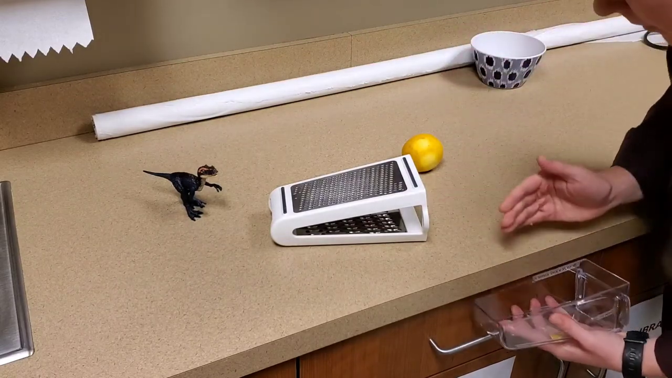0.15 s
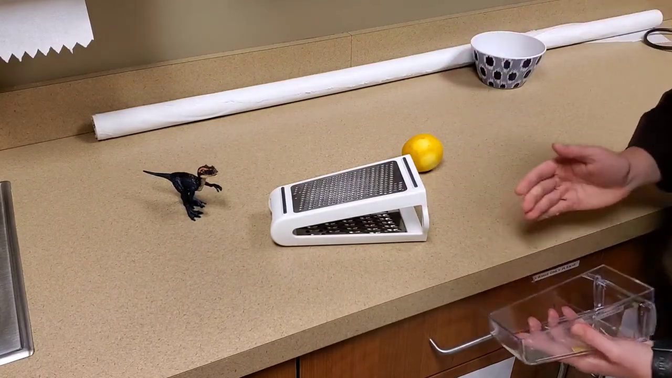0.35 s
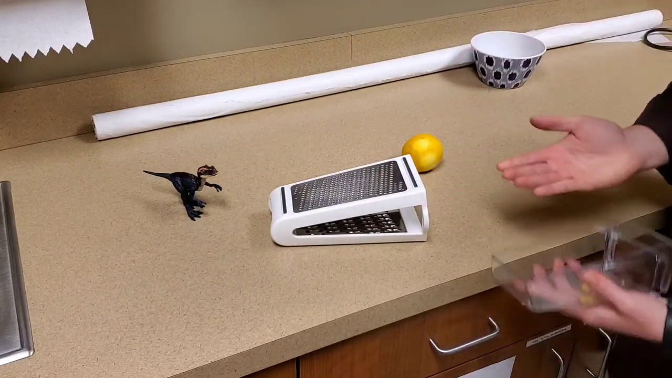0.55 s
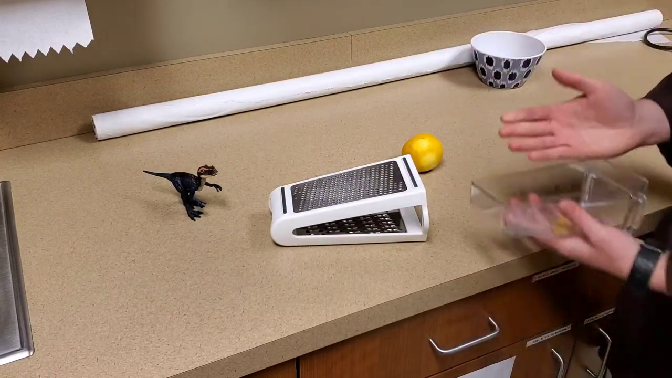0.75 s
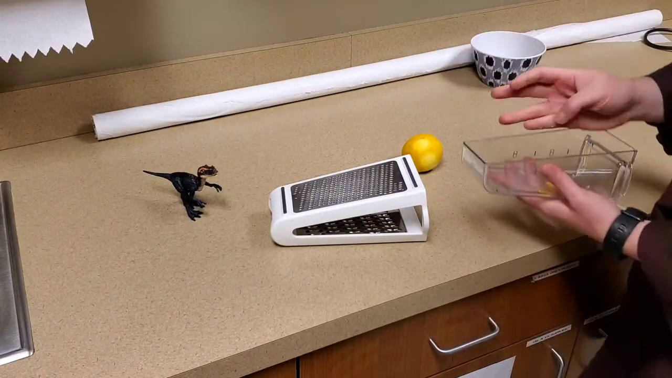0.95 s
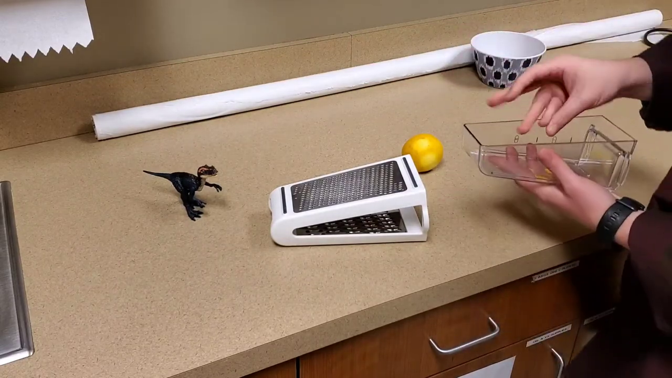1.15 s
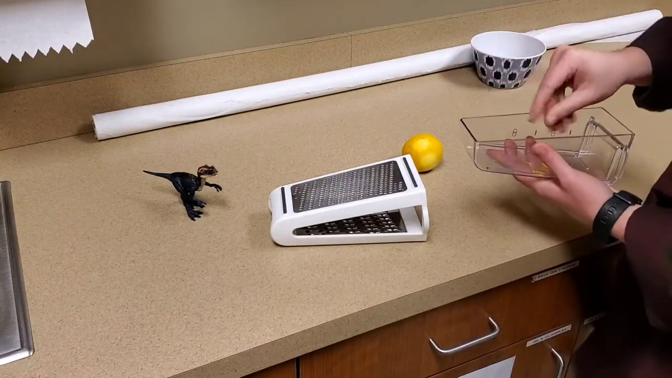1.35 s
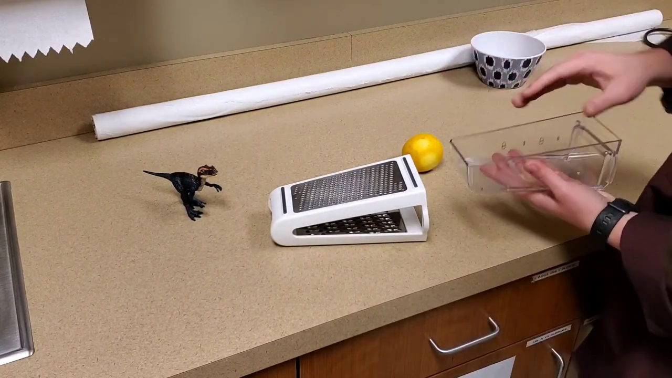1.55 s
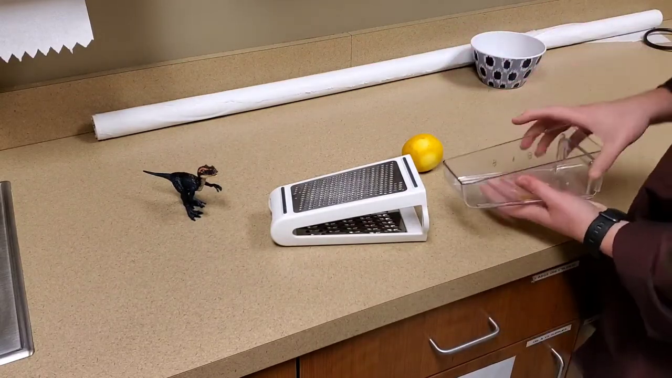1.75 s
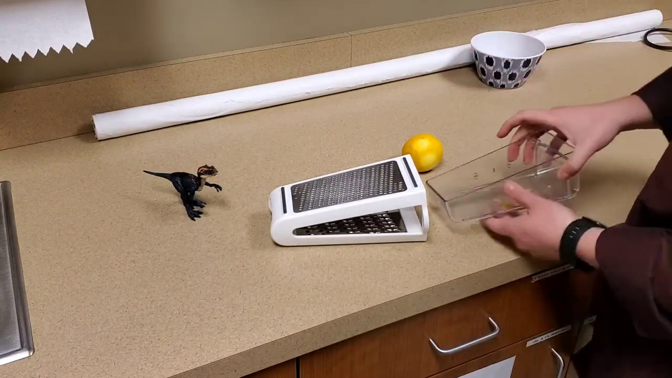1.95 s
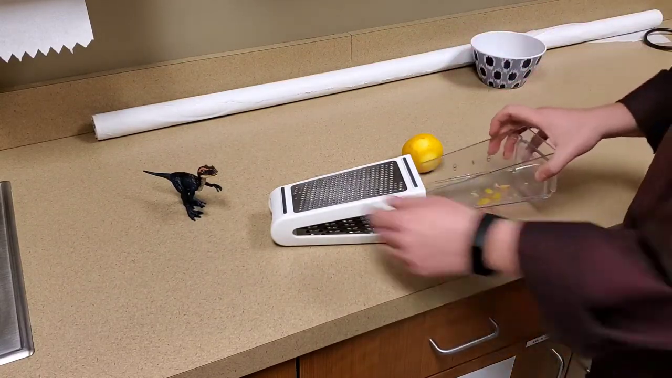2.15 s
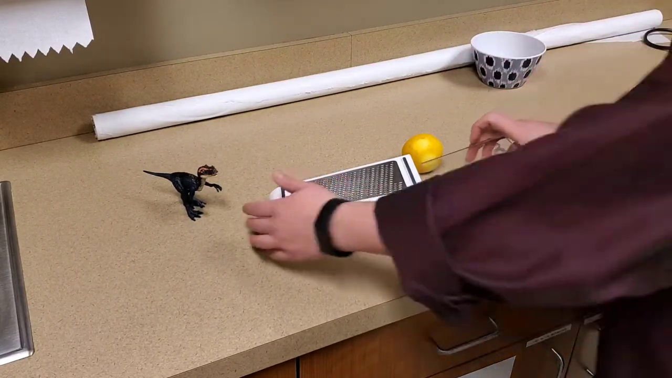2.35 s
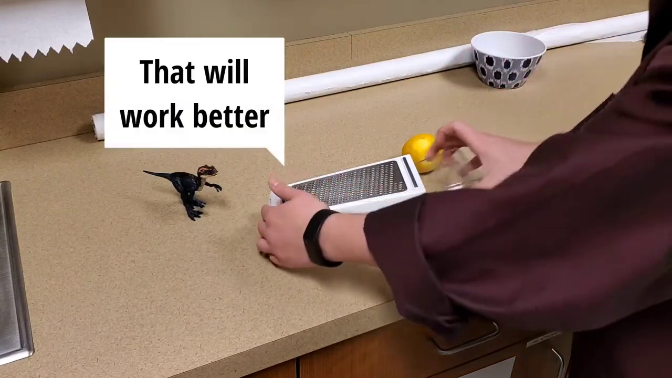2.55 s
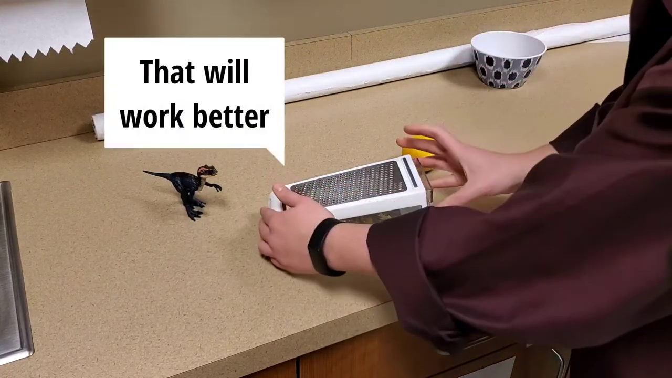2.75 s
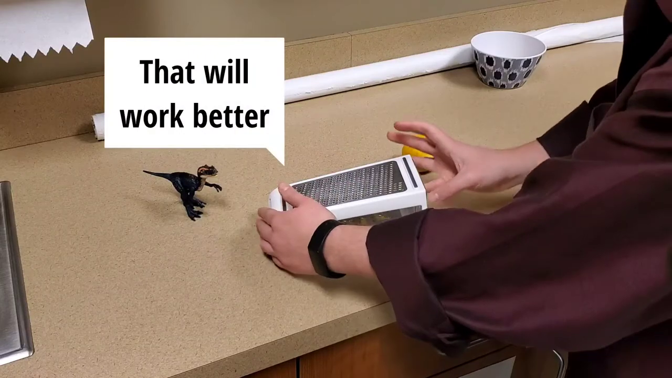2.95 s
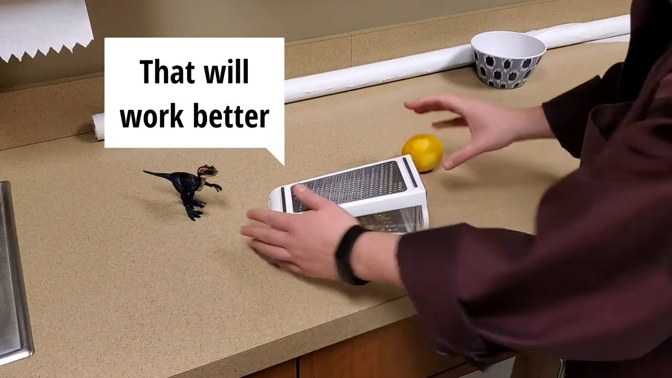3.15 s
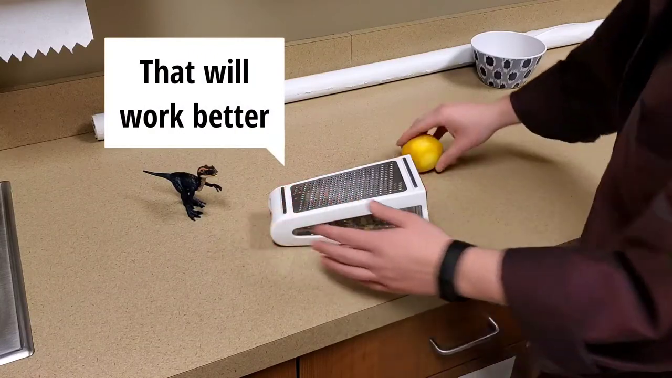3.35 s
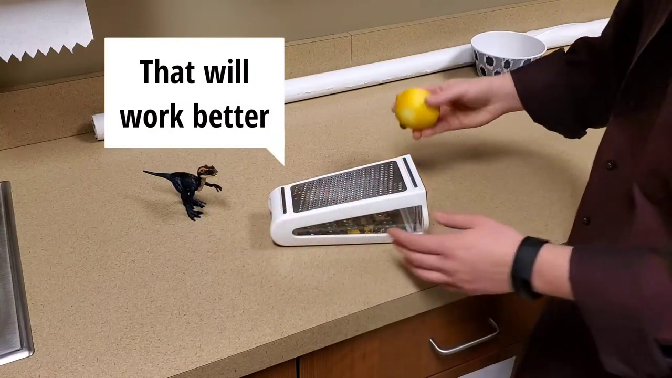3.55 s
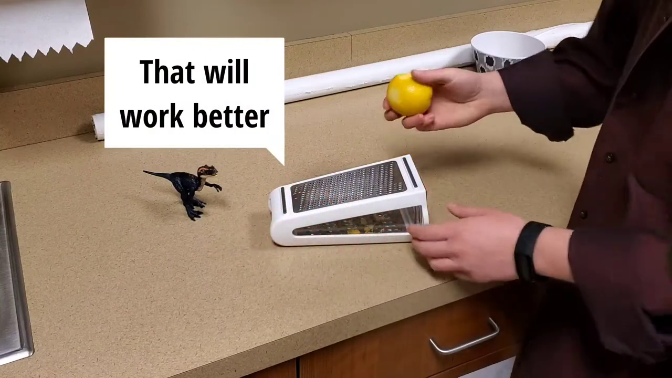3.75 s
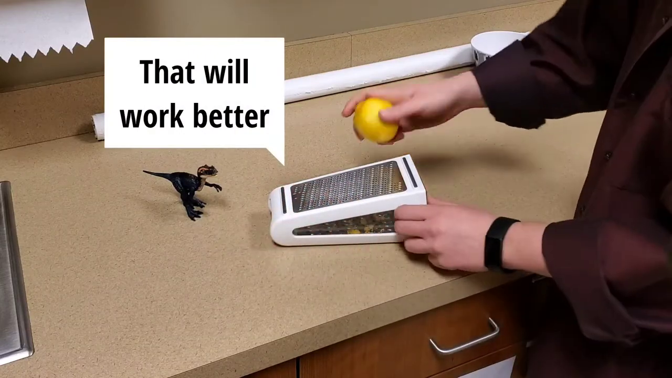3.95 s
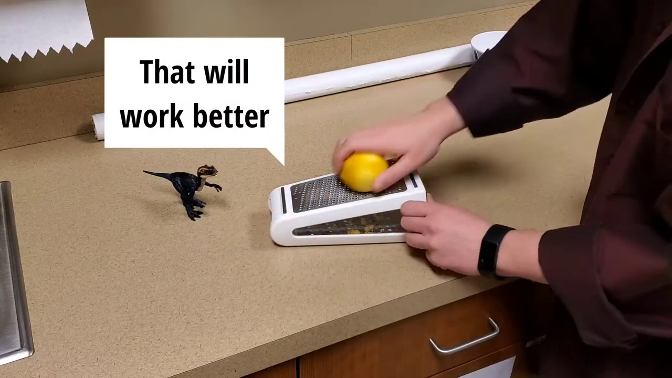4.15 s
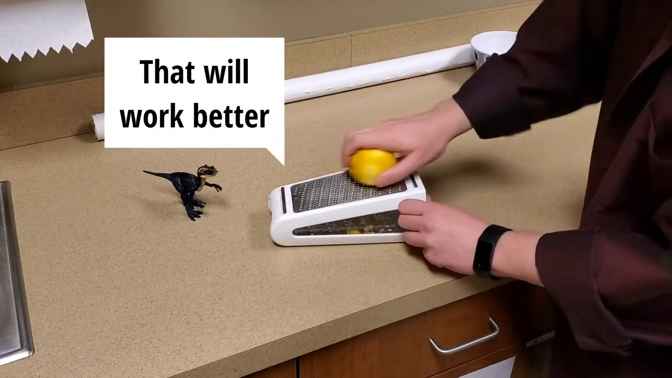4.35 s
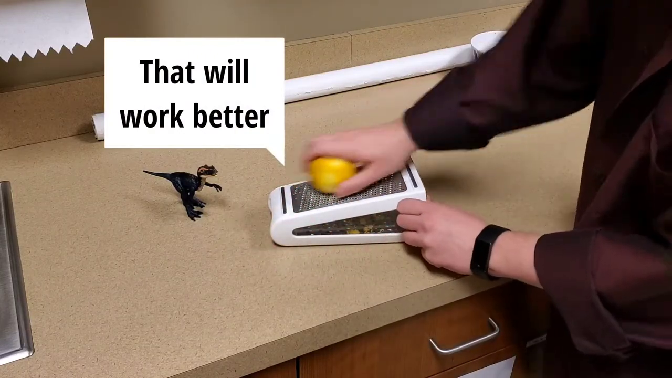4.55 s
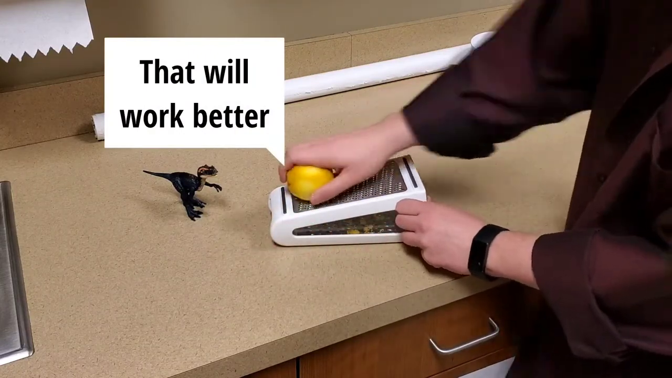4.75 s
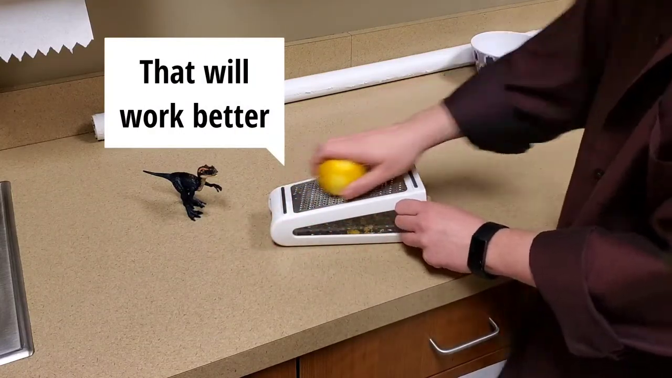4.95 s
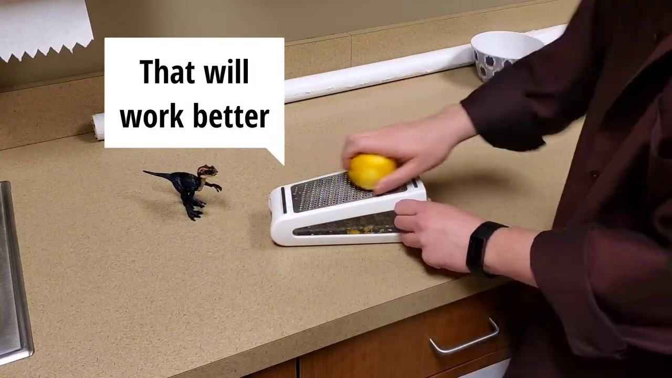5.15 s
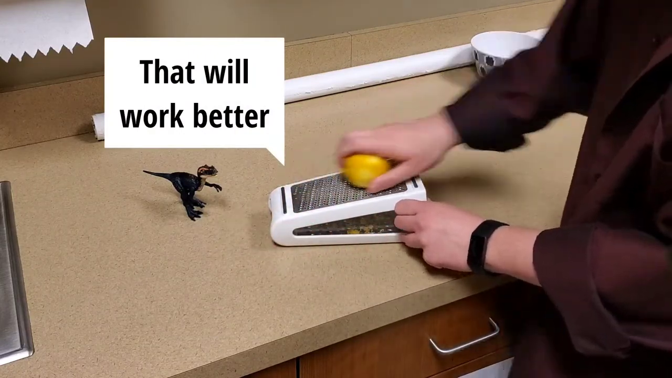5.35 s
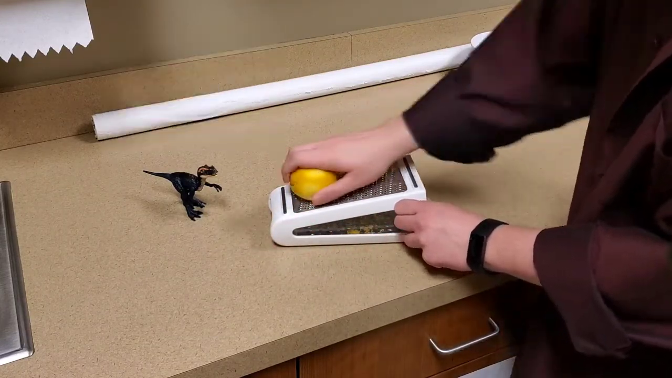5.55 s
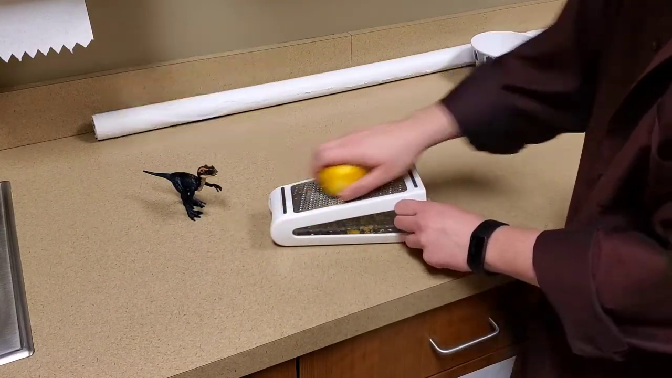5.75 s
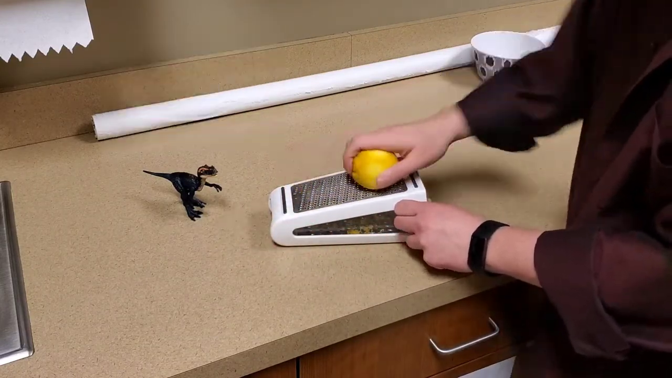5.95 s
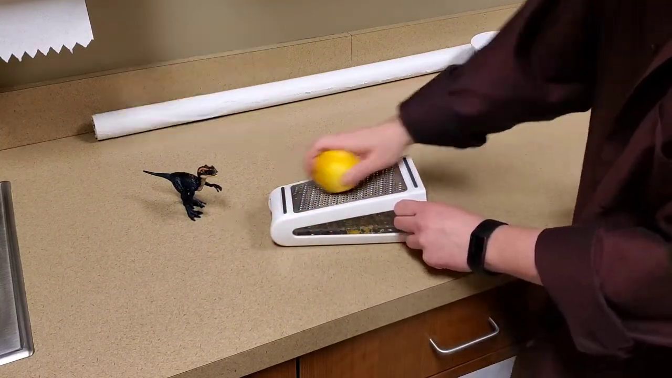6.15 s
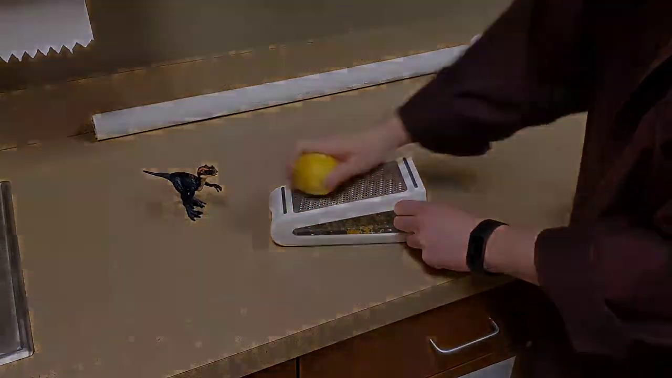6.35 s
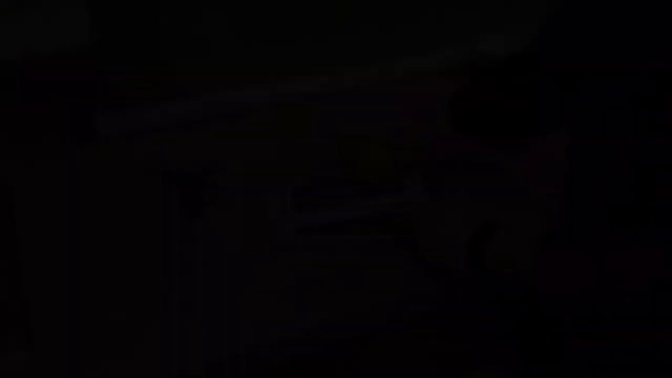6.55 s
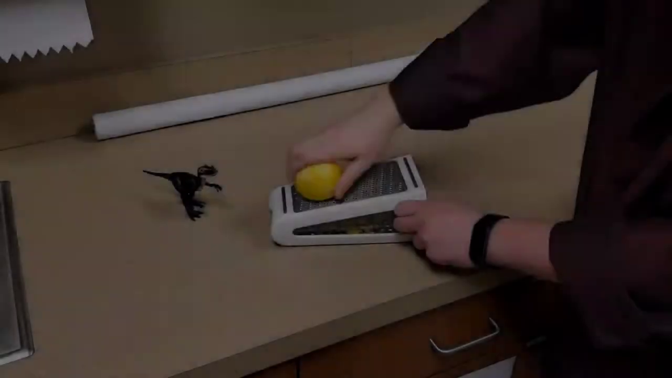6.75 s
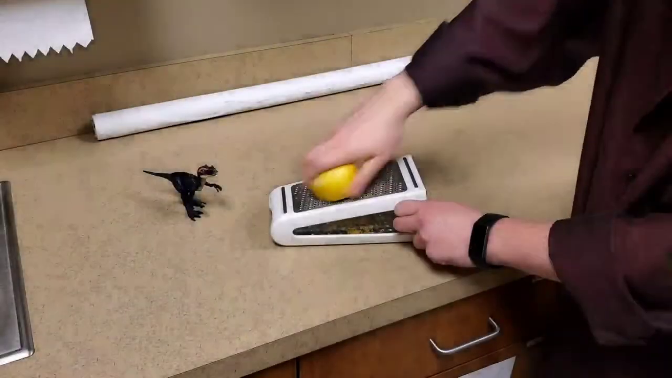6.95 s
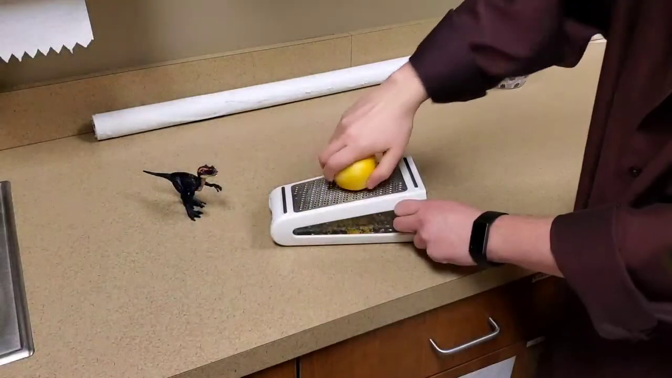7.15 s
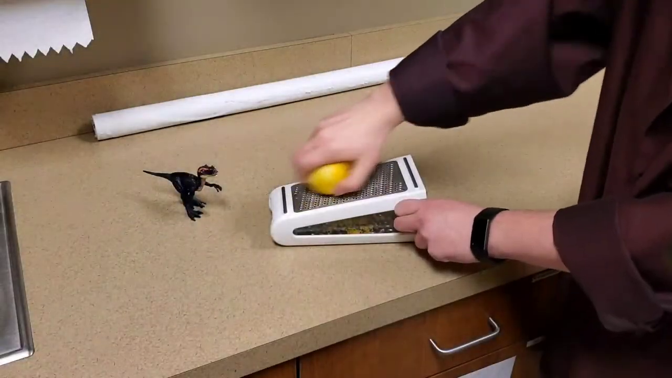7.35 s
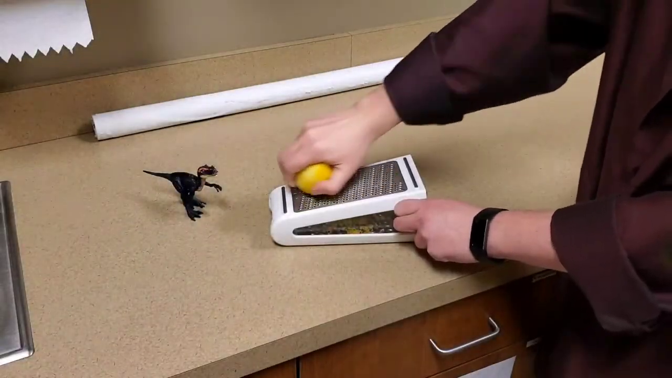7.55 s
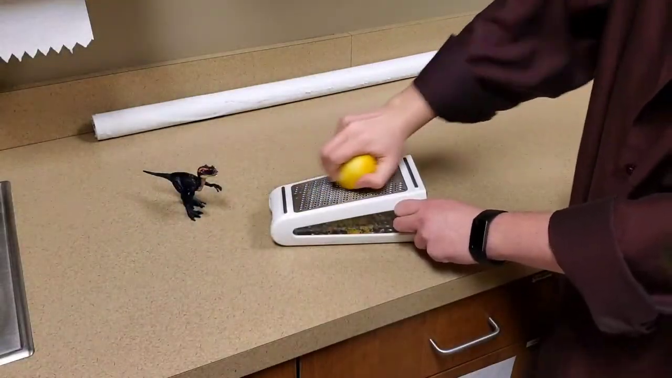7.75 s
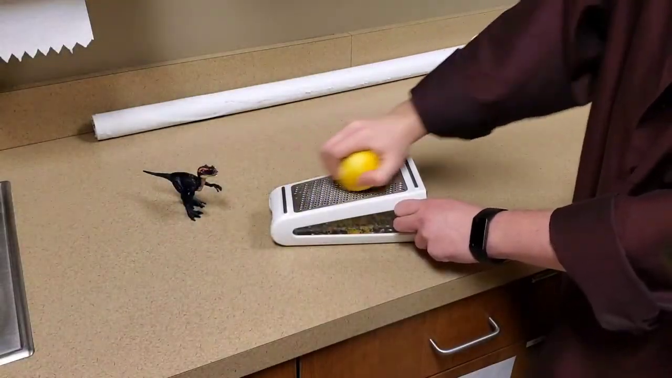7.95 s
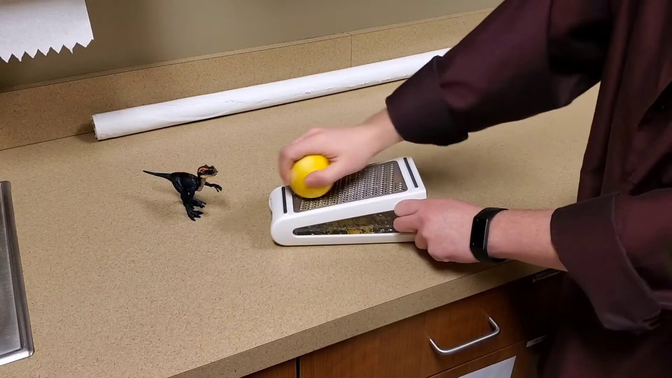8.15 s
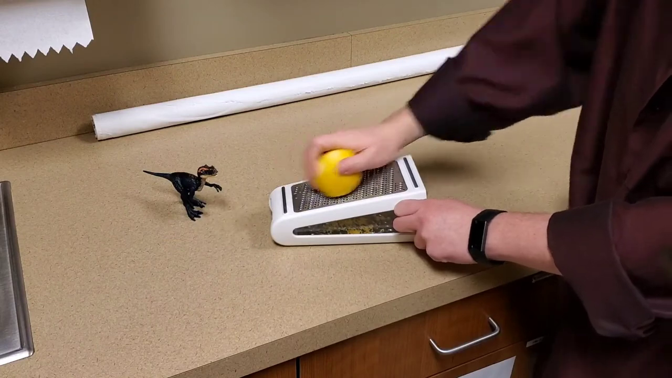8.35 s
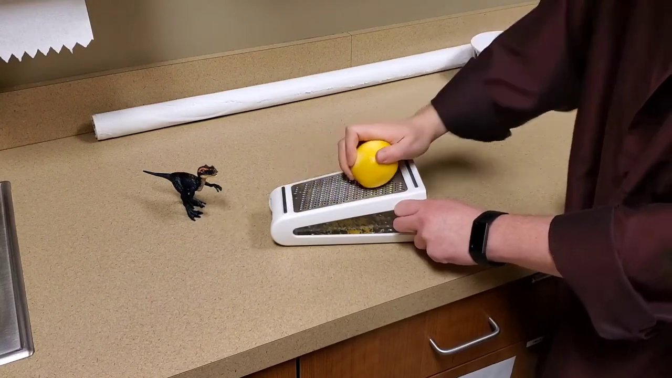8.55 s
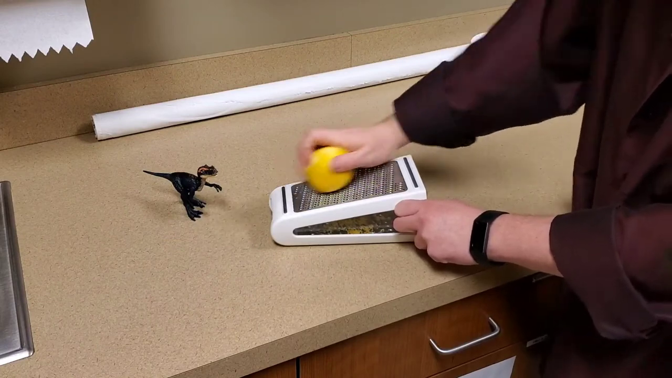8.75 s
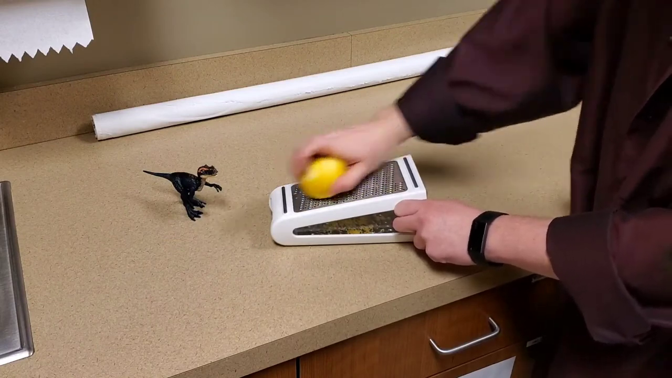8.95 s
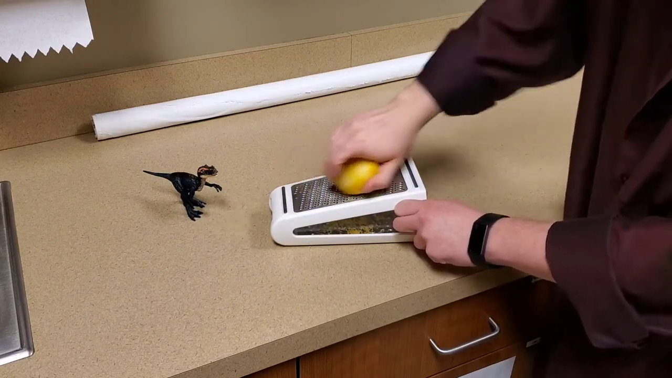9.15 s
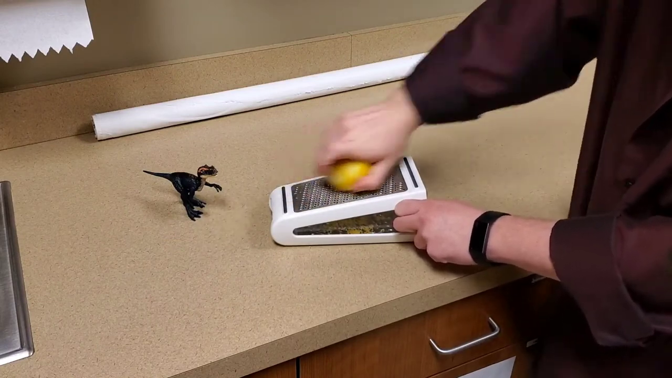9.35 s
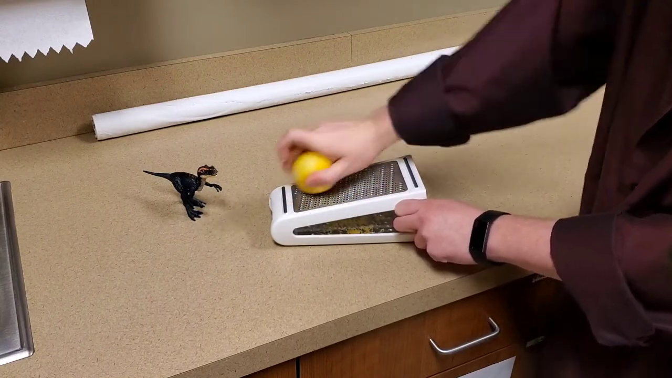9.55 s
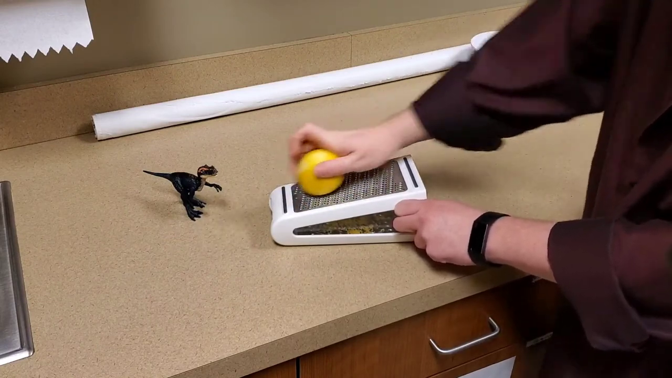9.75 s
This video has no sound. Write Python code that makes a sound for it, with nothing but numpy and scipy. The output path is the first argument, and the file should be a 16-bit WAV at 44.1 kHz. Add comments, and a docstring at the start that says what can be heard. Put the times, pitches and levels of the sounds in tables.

```python
"""A soft low rumble with a faint hiss (shaped noise) and faint brushes of sleeves and fingers (random grains).
A clear plastic tray is then pushed home under a flat metal grater, which clatters on a kitchen counter: each
knock sums dying modes of counter and frame with a crack of filtered noise. Last, a lemon is rubbed back and
forth over the teeth, about seven strokes a second, and once the sound drops away briefly: random tooth clicks
hiss, ring the plate and drum the counter; soft bumps and short judders join in."""
import sys
import numpy as np
from scipy import signal
from scipy.fft import rfft, irfft
from scipy.io import wavfile
from scipy.ndimage import uniform_filter1d

SR = 44100
rng = np.random.default_rng(int(sys.argv[2]) if len(sys.argv) > 2 else 0)


def digitize_waveform(pressure):
    """Quantize a signal to 16-bit integers and store it at the path in sys.argv[1].

    Rows of a 2-D input are taken as channels; values are limited to [-1, 1].
    """
    field = np.atleast_2d(pressure).T
    bounded = np.clip(field, -1, 1)
    quanta = np.round(bounded * 32767).astype(np.int16)
    wavfile.write(sys.argv[1], SR, quanta)


N = 432180
TIME = np.arange(N) / SR
ALL_HZ = np.fft.rfftfreq(N, 1 / SR)
SHORT = 2 ** 15  # samples per single event
RING_TIME = np.arange(SHORT) / SR
HZ = np.fft.rfftfreq(SHORT, 1 / SR)
EDGE_HZ = 15950


def gain_of(db):
    """Decibels to gain."""
    return 10 ** (np.asarray(db) / 20)


def evened(x):
    """Scales to rms 1."""
    return x / np.sqrt(np.mean(abs(x) ** 2) + 1e-20)


def read(points, hz):
    """Reads a table on a log-frequency axis."""
    point_hz, value = np.transpose(points)
    return np.interp(np.log(hz + 1), np.log(point_hz + 1), value)


def follow(points):
    """Gain over time from rows of (time_s, gain_db); end values hold outside."""
    return gain_of(np.interp(TIME, *np.transpose(points)))


def add(mix, start_s, sound):
    """Adds a sound at start_s, cut at the end of the mix."""
    part = mix[..., round(start_s * SR):][..., :sound.shape[-1]]
    part += sound[..., :part.shape[-1]]


def shaded(x, gain):
    """Filters a whole track by a gain at each of ALL_HZ."""
    return irfft(rfft(x) * gain, N)


def colour(x, gain):
    """Causal (minimum-phase) filter, gain at each of HZ: resonances ring after the blow."""
    log_gain = np.log(np.maximum(gain, 1e-5))
    circle = np.concatenate([log_gain, log_gain[-2:0:-1]])
    response = np.exp(np.conj(signal.hilbert(circle)))[:len(HZ)]
    return irfft(rfft(x, SHORT) * response)


def band(lo_hz, hi_hz, order=6):
    """Gain of a band with Butterworth-shaped edges."""
    low_edge = 1 + (lo_hz / (HZ + 1)) ** (2 * order)
    high_edge = 1 + (HZ / hi_hz) ** (2 * order)
    return 1 / np.sqrt(low_edge * high_edge)


def dying_noise(t60):
    """Two channels of dense reflections, energy 1, that die in t60 seconds."""
    tail = rng.standard_normal((2, SHORT)) * gain_of(-60 * RING_TIME / t60)
    return tail / np.linalg.norm(tail, axis=1, keepdims=True)


def ring(modes, damping):
    """Sum of dying sines at random phases; damping divides each t60."""
    total = np.zeros(SHORT)
    for hz, db, t60_s in modes:
        envelope = gain_of(db - 60 * damping * RING_TIME / t60_s)
        total += envelope * np.sin(2 * np.pi * (hz * RING_TIME + rng.random()))
    return total


def swell(rise):
    """Soft start of a vibration that builds in about rise seconds."""
    return 1 - np.exp(-RING_TIME / rise)


def blow(sound, db):
    """Sets the rms level of a blow's first 30 ms."""
    return gain_of(db) * sound / np.sqrt(np.mean(sound[..., :int(.03 * SR)] ** 2))


def teeth(size, per_s, spread_db):
    """Random sparse clicks of either sign, rms 1: a few contacts catch hard, most lightly."""
    click = gain_of(spread_db * np.minimum(rng.exponential(1, size), 5)) * rng.choice([-1, 1], size)
    return evened(click * (rng.random(size) < per_s / SR))


# stereo width: pitch_hz, side_over_mid_db
SPREAD = [(60, -36.5), (110, -25), (250, -8), (500, -11.5), (1000, -4.5), (2000, -2), (4400, 0), (8000, -4),
          (15000, -3)]
# stereo balance: pitch_hz, left_over_right_db
LEAN = [(60, 0.5), (700, 0.5), (1300, 1), (2400, 0.5), (4400, 3.5), (8000, 0.5), (15000, 5)]


def stereo(mid, side):
    """Left and right: the bass is nearly mono, the treble wide and a little to the left."""
    side = shaded(side, gain_of(read(SPREAD, ALL_HZ)))
    lean_db = np.outer([.5, -.5], read(LEAN, ALL_HZ))
    return shaded(np.array([mid + side, mid - side]), gain_of(lean_db))


def kitchen(x, early_db=-1, early_t60=0.05, late_db=-8, late_t60=0.47, scatter_hz=900):
    """Mid and side of a sound on the counter: near surfaces scatter the treble, the room rings longer."""
    scatter = gain_of(early_db) * 1j * HZ / (1j * HZ + scatter_hz)
    early = scatter * rfft(dying_noise(early_t60))
    late = gain_of(late_db) * rfft(dying_noise(late_t60))
    paths = early + late
    wet = abs(scatter) ** 2 + gain_of(late_db) ** 2
    mid_side = np.array([(1 + paths[0]) / np.sqrt(1 + wet), paths[1] / np.sqrt(wet)])
    return irfft(rfft(x) * mid_side) * np.minimum(np.linspace(10, 0, SHORT), 1)  # last tenth fades


ROOM_NOISE_DB = -47.5  # rms
# room noise spectrum: pitch_hz, relative_level_db (per Hz)
ROOM_NOISE = [(20, -27), (45, -11), (65, 0), (120, -6), (185, -1), (270, -10), (400, -10), (630, -17),
              (1000, -30), (2200, -44), (4200, -46), (5600, -39), (7000, -33), (8200, -42), (15800, -43.3)]
# left-right likeness: pitch_hz, correlation (0-1)
ROOM_SAME = [(60, 0.066), (130, 1), (290, 0.88), (640, 0.42), (1410, 0.34), (3100, 0.64), (6820, 0.72),
             (15000, 1)]


def room_noise():
    """Low ventilation rumble and a faint hiss: partly correlated noise, shaped in frequency."""
    a, b = rng.standard_normal((2, N))
    same = np.clip(read(ROOM_SAME, ALL_HZ), -1, 1)
    pair = np.array([a, shaded(a, same) + shaded(b, np.sqrt(1 - same ** 2))])
    return gain_of(ROOM_NOISE_DB) * evened(shaded(pair, gain_of(read(ROOM_NOISE, ALL_HZ))))


# sleeves and fingers brush while tray and lemon are carried: peak_s, length_s, level_db, tilt_db_per_octave
BRUSHES = [(.59, .2, -60, 3), (.8, .3, -67, 2), (1.21, .22, -64, 7), (1.455, .06, -54, 3),
           (1.745, .07, -59, 3), (1.9, .42, -59, 0), (2.38, .34, -60.5, 1), (4.08, .16, -57.5, -1)]
# spectrum of a brush: pitch_hz, relative_level_db
RUSTLE_COLOUR = [(300, -22.5), (1500, 7.5), (3500, -1), (7000, 3), (10000, -4.5), (13000, 3.5),
                 (16000, 6.5)]
# shares of the length before and after the peak; level there, re peak
BRUSH_RISE, BRUSH_FALL, BRUSH_EDGE_DB = 0.48, 0.47, -7


def rustle(pivot_hz=7000):
    """Fine grains of cloth and skin sliding on plastic; each brush swells and fades."""
    mix = np.zeros((2, N))
    middle_s = RING_TIME[-1] / 2
    for peak_s, length_s, db, tilt_db in BRUSHES:
        since = (RING_TIME - middle_s) / length_s
        slide = gain_of(BRUSH_EDGE_DB * (since / np.where(since < 0, BRUSH_RISE, BRUSH_FALL)) ** 2)
        shade_db = read(RUSTLE_COLOUR, HZ) + tilt_db * np.log2((HZ + 1) / pivot_hz)
        shade = gain_of(shade_db) * band(20, EDGE_HZ)
        grains = np.array([colour(teeth(SHORT, per_s=6700, spread_db=3.5), shade) for _ in range(2)])
        add(mix, peak_s - middle_s, gain_of(db) * slide * evened(grains))
    return mix


# hand and lemon bump the grater down on the counter: start_s, level_db
BUMPS = [(3.37, -35.5), (4.112, -39), (4.215, -30), (4.254, -36), (4.934, -26.5), (5.152, -27.5),
         (5.421, -24.5), (5.695, -31), (5.966, -34), (6.518, -35), (7.305, -33.5)]
# counter top modes, also played by thud(): pitch_hz, relative_level_db, t60_s (before damping)
COUNTER = [(73.2, -3.5, 0.66), (109.8, -4, 0.37), (122.4, -2, 0.36), (136, 1, .3), (196, -17, 0.11)]


def bumps(softness_hz=80, rise=0.011):
    """A soft push wakes mainly the lowest mode of the counter."""
    mix = np.zeros(N)
    soft = [(hz, db - 40 * np.log10(max(hz / softness_hz, 1)), t60_s) for hz, db, t60_s in COUNTER]
    for start_s, db in BUMPS:
        add(mix, start_s, blow(ring(soft, damping=2.43) * swell(rise) ** 2, db))
    return mix


def thud(rise=0.0067):
    """The heavy counter takes up the blow slowly."""
    return ring(COUNTER, damping=1.5) * swell(rise) ** 2


# dense upper modes of the plastic: pitch_hz, relative_level_db
CLACK = [(150, 4), (250, -1.5), (400, -3.5), (900, -3.5), (1130, -4), (1450, 3.5), (2600, -5), (3100, -10),
         (4200, -9.5), (5500, -19.5), (9000, -22.5), (16000, -16)]


def crack(clack_db, tick_db, puff_db, direct=1.15):
    """A noise burst with a room tail, coloured by the plastic and levelled in three bands."""
    burst = (direct * dying_noise(t60=.05) + dying_noise(t60=0.32)) * swell(rise=0.003)
    plastic = gain_of(read(CLACK, HZ))
    clack = blow(colour(burst, plastic * band(1000, 6200)), clack_db)
    tick = blow(colour(burst, plastic * band(5600, 13000)), tick_db)
    puff = blow(colour(burst, plastic * band(140, 1000)), puff_db)
    return clack + tick + puff


# grater with its tray, free to ring: pitch_hz, relative_level_db, t60_s (before damping)
FRAME = [(381, -17.5, 0.38), (500, -15, 0.36), (685, -13, .35), (743.5, 4.5, 0.28), (765, -0.5, 0.33),
         (846, -20.5, 0.27), (1420, -2.5, 0.18), (1544, -9.5, 0.22), (1710, -14.5, 0.35), (2050, -22, 0.18),
         (2280, -13, .3), (2471, -14, .3), (2654, -17.5, .27), (2950, -21, 0.5), (3483, -18, .3),
         (4040, -15.5, 0.18), (4221, -22, 0.22)]


def frame_ring(hollow_db, upper_db, rise=0.001, side_share=0.73):
    """Mid and side of the ringing frame; the hand's grip shifts its modes from knock to knock."""
    struck = [(hz * (1 + 0.0087 * rng.standard_normal()), db + 2 * rng.standard_normal(), t60_s)
              for hz, db, t60_s in FRAME]
    held = swell(rise) * (1 + 0.8 * np.exp(-RING_TIME / 0.059))  # hand damps, room carries on
    channels = []
    for share in (1, side_share):
        low = ring([mode for mode in struck if mode[0] < 1000], damping=1.1) * held
        high = ring([mode for mode in struck if mode[0] >= 1000], damping=1) * held
        channels.append(share * (blow(low, hollow_db) + blow(high, upper_db)))
    return np.array(channels)


# tray and frame knock: start_s, thud_db, hollow_ring_db, clack_db, tick_db
KNOCKS = [(0.056, -60, -54.5, -66, -82), (2.536, -30, -31.5, -45, -37), (2.562, -36, -36, -41.5, -49.5),
          (2.593, -27.5, -29, -40.5, -49.5), (2.667, -19, -22.5, -27.5, -37.5),
          (2.691, -24.5, -15.5, -21, -34), (2.749, -24, -17, -33.5, -56), (2.774, -29.5, -20.5, -28.5, -50),
          (2.815, -41, -31, -62, -65), (2.936, -43, -49, -55, -61), (2.953, -39, -36, -50.5, -58)]


def knocks(puff_re_hollow_db=-9):
    """Each knock thuds the counter, rings the frame and sets off a crack with a room tail."""
    mix = np.zeros((2, N))
    for start_s, thud_db, hollow_db, clack_db, tick_db in KNOCKS:
        add(mix, start_s, crack(clack_db, tick_db, hollow_db + puff_re_hollow_db))
        add(mix, start_s, frame_ring(hollow_db, upper_db=clack_db))
        add(mix[0], start_s, blow(thud(), thud_db))
    return stereo(*mix)


# broad colour of the plate under the lemon: pitch_hz, relative_level_db
SCRAPE = [(30, -14), (55, -0.5), (95, -2.5), (150, 7.5), (260, -6.5), (400, -6), (550, -2), (760, -8.5),
          (1110, -16), (1270, -4), (1800, -11.5), (4500, -12), (7000, -13), (8500, -17.5), (16000, -16)]
# mean plate resonances: pitch_hz, width_hz, lift_db
PLATE = [(75.2, 20, 12.9), (113.4, 7.6, 10), (142.6, 25, 8.3), (300, 19, 8), (634, 11, 9.9), (697, 43, 7.4),
         (772, 28, 8.5), (945, 43, 9.3), (1341, 48, 6.1), (1389, 28, 7), (1570, 28, 7.6), (1997, 79, 2.3),
         (2258, 71, 6.3), (2390, 44, 4.7), (2556, 55, 8.2), (3480, 120, 1.2), (4110, 220, 2.1)]


def plate_response(detune=0.0045, vary=0.24, wander_db=1.0, ripples_per_octave=0.6, patchy_db=1.3):
    """The lemon loads and damps the plate's resonances a little differently at every place."""
    total_db = read(SCRAPE, HZ)
    for hz, width_hz, lift_db in PLATE:
        a, b = rng.standard_normal(2)
        offset = 2 * (HZ - hz * (1 + detune * b)) / width_hz
        total_db = total_db + lift_db * (1 + vary * a) / (1 + offset ** 2)
    ripple = np.sin(2 * np.pi * (ripples_per_octave * np.log2(HZ + 1) + rng.random()))
    wander = wander_db * ripple / (1 + HZ / 3000)
    patches = evened(uniform_filter1d(rng.standard_normal(len(HZ)), size=220))
    upper_modes = patchy_db * patches * HZ / (HZ + 1500)
    return gain_of(total_db + wander + upper_modes)


# peel snags on a row of teeth and judders free: start_s, level_db, band_middle_hz
SNAGS = [(4.481, -40.5, 1100), (4.955, -33, 304), (5.515, -40, 1090), (6.080, -33.5, 1060),
         (6.863, -51, 1100), (7.875, -39, 370), (8.025, -29, 1080), (8.445, -31.5, 433), (8.570, -34, 1090),
         (9.518, -31, 1210)]


def snag(db, hz, cycles=24, reach=1.33):
    """A short judder rings the low plate resonances; a deep bite judders lower and longer."""
    judder = teeth(SHORT, per_s=2500, spread_db=3.0) * np.exp(-RING_TIME * hz / cycles)
    rung = colour(judder, plate_response() * band(hz / reach, hz * reach, order=3))
    return kitchen(blow(rung, db))


def stroke(length_s, crest, hiss_db, plate_db, drum_db, clump_db=1.24):
    """The lemon speeds up, slows and turns; tooth clicks drive the plate and, via the frame, the counter."""
    phase = np.interp(RING_TIME / length_s, [0, np.clip(crest, .1, .9), 1], [0, .5, 1])
    speed = np.sin(np.pi * phase)
    touching = uniform_filter1d(1. * (RING_TIME < length_s), 200, mode="constant")
    # rows of teeth bite together
    clumps = gain_of(clump_db * evened(uniform_filter1d(rng.standard_normal(SHORT), 260)))
    # two sides of the contact patch
    near, far = (clumps * teeth(SHORT, per_s=2500, spread_db=2.5) for _ in range(2))
    shoves = teeth(SHORT, per_s=3000, spread_db=3.0)
    response = plate_response()

    def part(drive, db, gain, sharpness, rest):
        """One register: its drive follows a power of the speed."""
        sound = colour(drive * touching * (rest + abs(speed) ** sharpness), response * gain)
        return gain_of(db) * evened(sound) * np.sqrt(length_s * SR / SHORT)  # level over the stroke

    treble = band(2800, 19000)
    near_hiss, far_hiss = (part(side, hiss_db, treble, sharpness=2.12, rest=0.14) / np.sqrt(2)
                           for side in (near, far))
    plate = part(near + far, plate_db, band(407, 2634), sharpness=1.75, rest=0.14)
    drum = part(shoves, drum_db, band(49.5, 471), sharpness=0.95, rest=0.31)
    return kitchen(near_hiss + plate + drum) + kitchen(far_hiss)


# spells of evenly paced strokes: start_s, end_s, stroke_count, top_speed_place (0-1 of a stroke),
# plate_over_hiss_db, drum_db (at USUAL_DB)
SPELLS = [(4.204, 5.083, 7, 0.49, -1.72, -37), (5.085, 6.592, 11, .37, 1, -37.5),
          (6.706, 7.957, 9, 0.44, 2, -34), (7.958, 8.939, 7, 0.44, 2.5, -33),
          (8.942, 9.888, 7, 0.54, 1.1, -34)]
# press of the lemon as mean hiss level, before the DROPOUT gain: time_s, level_db
PRESSURE = [(4.27, -54), (4.39, -47), (4.52, -38.5), (4.66, -36.5), (5.15, -35.5), (5.7, -36), (6.1, -40),
            (6.52, -41), (6.78, -50), (6.91, -36.5), (7.33, -39), (7.46, -34), (7.6, -39), (8.02, -34),
            (8.4, -38), (8.58, -34), (8.95, -36.5), (9.42, -32.5), (9.8, -37.5)]
# a push bites brighter and peaks later than the average, a pull duller and earlier
PUSH_HISS_DB, PUSH_LATER = 0.87, 0.03
OVERLAP_S = 0.0017  # peel still drags as the hand turns round
# the counter drums with the arm's weight and hardly follows the bite
USUAL_DB, DRUM_FOLLOWS = -34, 0.26
UNEVEN_DB = 0.03  # chance difference between strokes


def strokes():
    """Pushes and pulls in turn: rows of (start_s, length_s, crest, hiss_db, plate_db, drum_db)."""
    rows = []
    for start_s, end_s, count, crest, plate_db, drum_db in SPELLS:
        turns_s, length_s = np.linspace(start_s, end_s, round(count), endpoint=False, retstep=True)
        for turn_s in turns_s:
            way = 1 if len(rows) % 2 else -1  # push +1, pull -1
            db = np.interp(turn_s + length_s / 2, *np.transpose(PRESSURE))
            drum = drum_db + DRUM_FOLLOWS * (db - USUAL_DB)
            levels = np.array([db + way * PUSH_HISS_DB, db + plate_db, drum])
            levels += UNEVEN_DB * rng.standard_normal(3)
            rows.append((turn_s, length_s + OVERLAP_S, crest + way * PUSH_LATER, *levels))
    return rows


# the sound drops away briefly, quicker than the room would let it die; end gains hold before and after: time_s,
# gain_db
DROPOUT = [(6.585, 2.5), (6.625, -17), (6.715, -18), (6.765, -2.5)]


def grating():
    """All strokes and snags of the lemon on the grater."""
    mix = np.zeros((2, N))
    for start_s, *row in strokes():
        add(mix, start_s, stroke(*row))
    for start_s, db, hz in SNAGS:
        add(mix, start_s, snag(db, hz))
    return stereo(*mix) * follow(DROPOUT)


def scene():
    """The room, and everything on the counter."""
    return room_noise() + rustle() + bumps() + knocks() + grating()


def record(dry):
    """Full-scale limit, then the band limit."""
    lowpass = signal.firwin(767, EDGE_HZ, window=("kaiser", 9), fs=SR)
    return signal.oaconvolve(np.clip(dry, -1, 1), lowpass[None], "same")


dry = scene()
out = record(dry)
digitize_waveform(out)
```